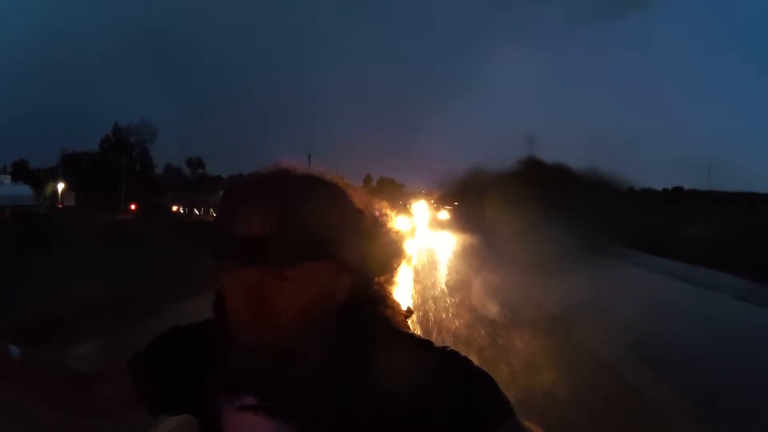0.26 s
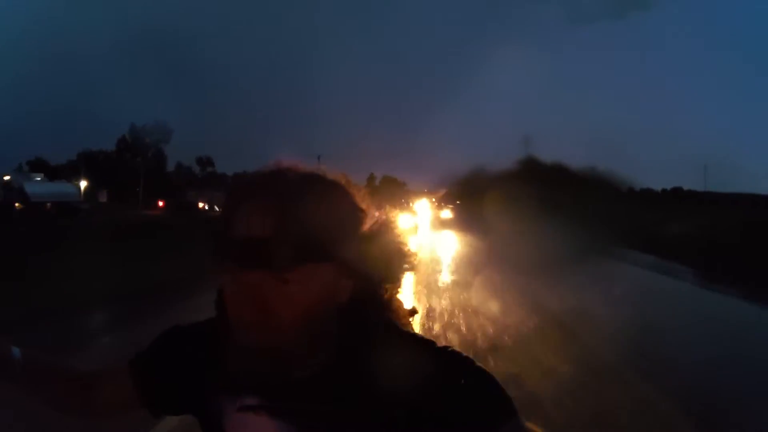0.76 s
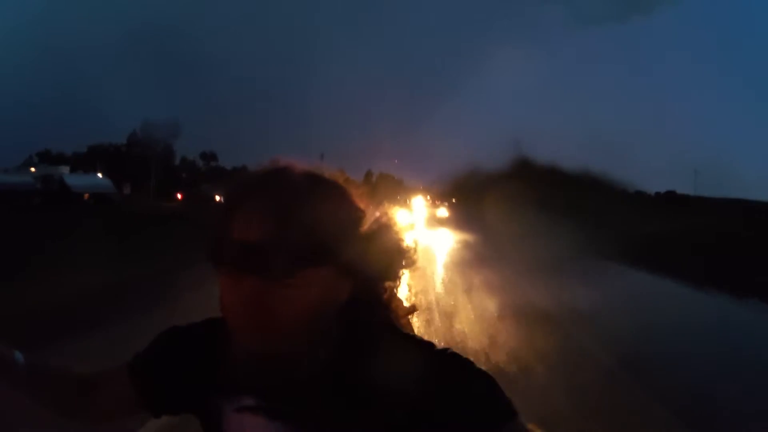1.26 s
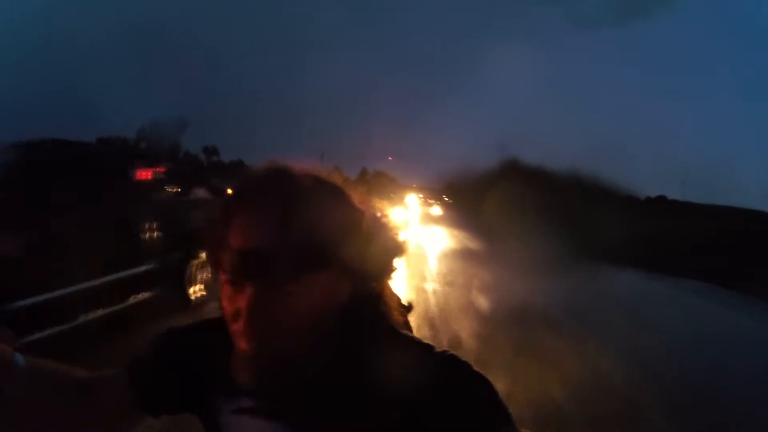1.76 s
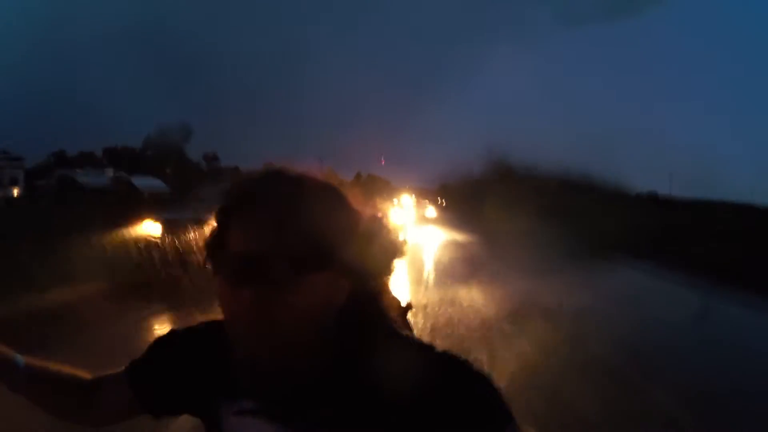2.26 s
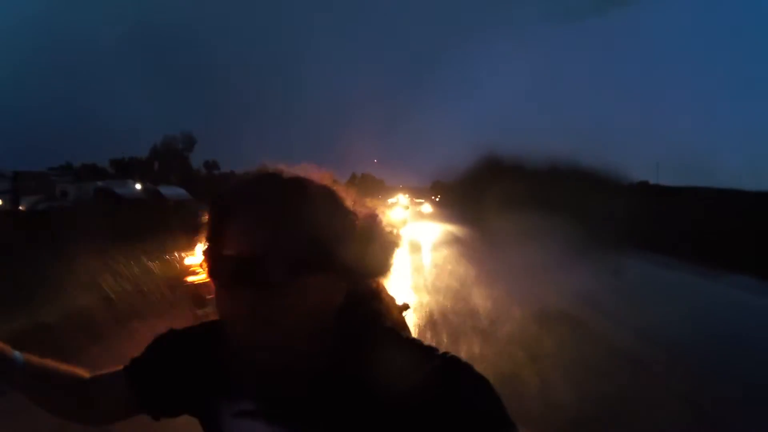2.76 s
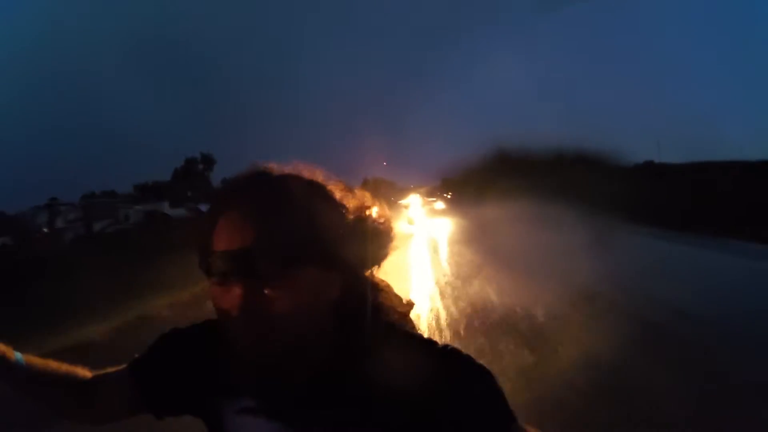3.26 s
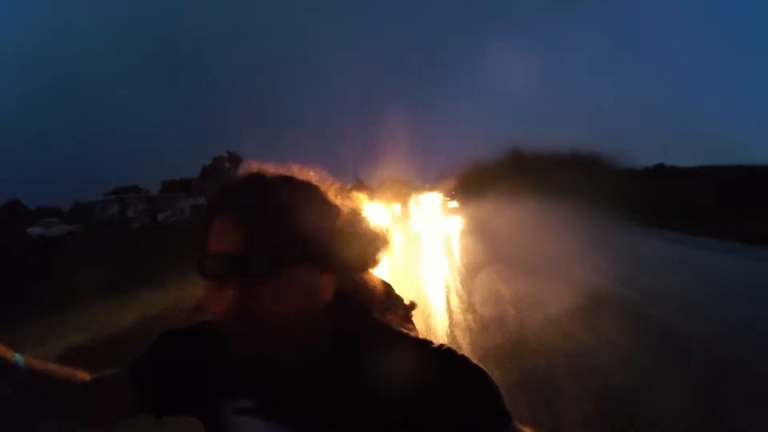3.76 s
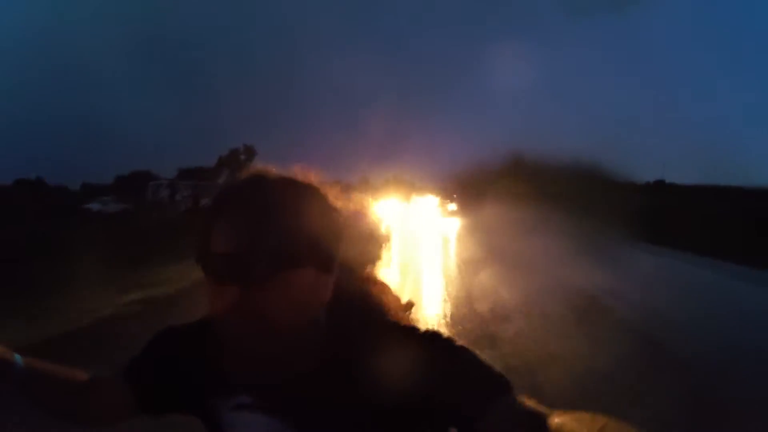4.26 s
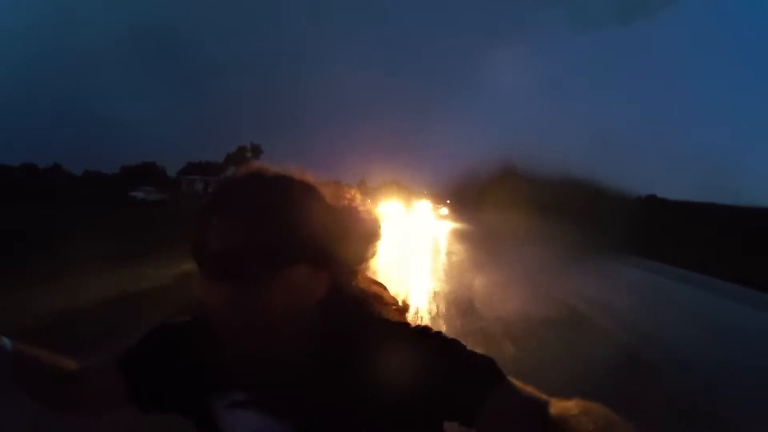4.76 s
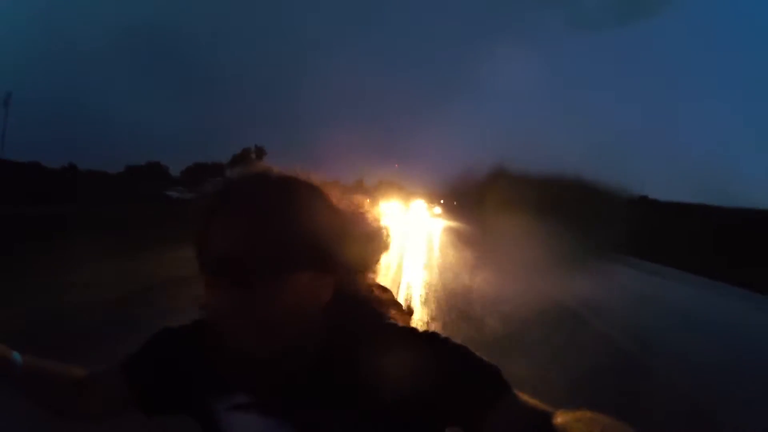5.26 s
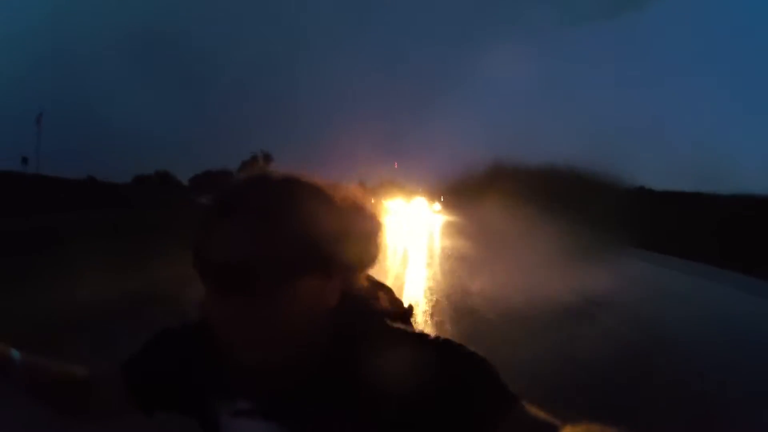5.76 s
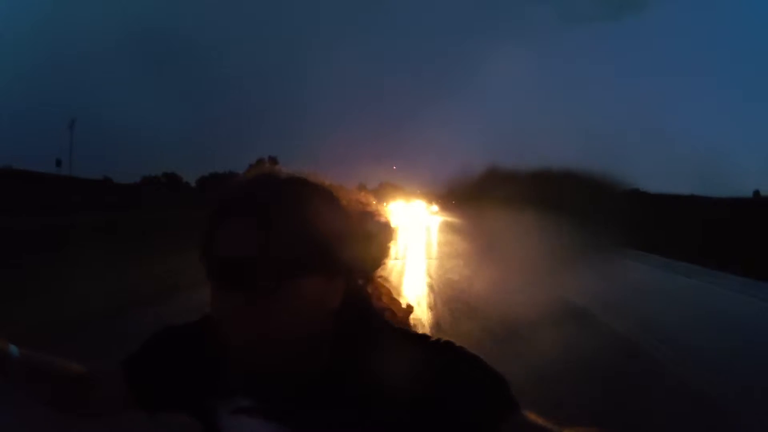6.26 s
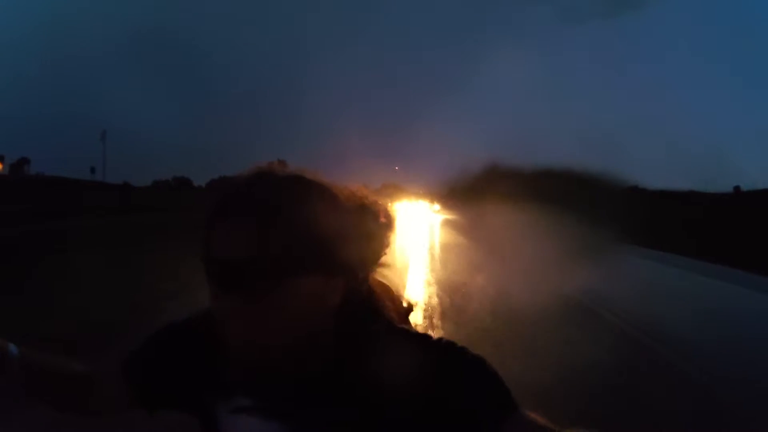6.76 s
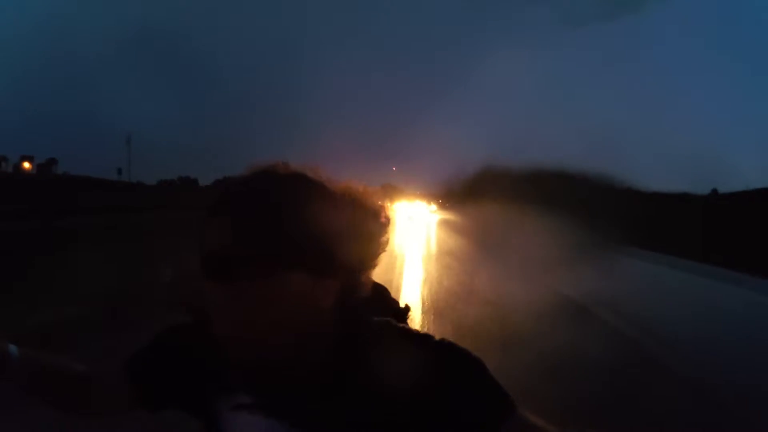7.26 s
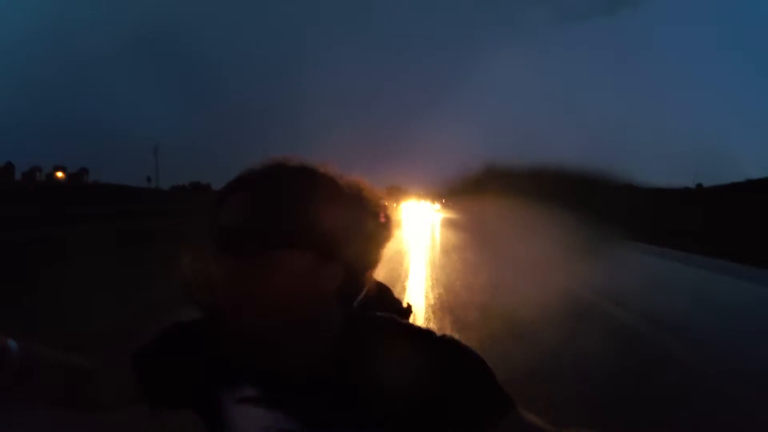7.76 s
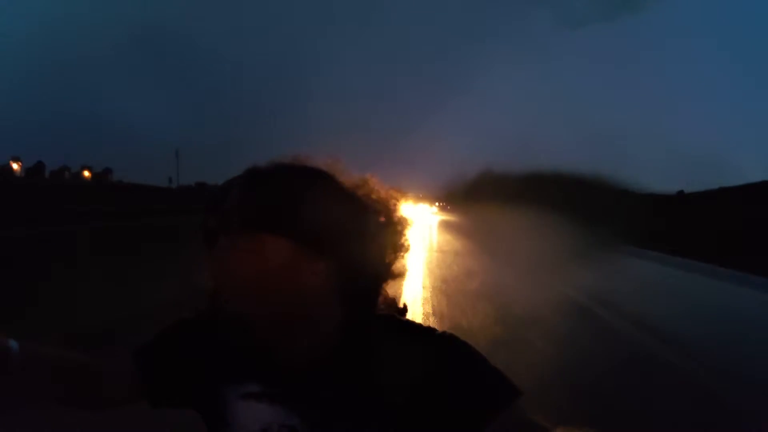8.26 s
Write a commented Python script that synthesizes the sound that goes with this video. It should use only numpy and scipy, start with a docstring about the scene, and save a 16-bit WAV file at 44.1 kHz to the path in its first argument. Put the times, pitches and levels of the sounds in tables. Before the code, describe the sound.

Heard from a case mounted on a moving motorcycle, a low twin-cylinder engine drones with light valve clatter, then pulls harder and rises in pitch. The revs fall abruptly with a faint whine, a few clacks and a brief squeal as the next gear catches, and it cruises on. Behind it are buffeting wind, spray from the wet road and sharp ticks of water drops.

```python
"""A V-twin motorcycle thrums along a wet highway, heard from a waterproof case on the bike.
It cruises, barks under an open throttle, shuts off for an upshift and cruises on.
Firings ring the pipe and muffler, pistons shake the frame, valves clatter and gears whine.
Behind the engine, wind rushes, tyres hiss through water and drops tick on the case."""
import sys
import numpy as np
from scipy import signal
from scipy.fft import rfft, irfft, next_fast_len
from scipy.io import wavfile
from scipy.ndimage import map_coordinates

SR = 44100
rng = np.random.default_rng(int(sys.argv[2]) if len(sys.argv) > 2 else 0)


def wrap_up_sound(samples):
    """Save the sound to the file named by the first command line argument, as 16-bit audio."""
    columns = np.atleast_2d(samples).T
    # keep every value between -1 and 1, then stretch to whole-number steps
    tamed = np.clip(columns, -1, 1)
    steps = np.round(tamed * 32767).astype(np.int16)
    wavfile.write(sys.argv[1], SR, steps)


N = 376173
TIME = np.arange(N) / SR

# air and water rushing past (time [s], relative wind level [dB], relative spray level [dB])
ROAD_LEVELS = [(0.0, -26, -56), (1.14, -32.5, -51.5), (1.8, -36.5, -60), (3.82, -31, -57), (4.39, -30, -58),
               (5.25, -30.5, -54.5), (5.51, -30.5, -58.5), (5.8, -36, -62), (7.86, -29, -53),
               (8.53, -31.5, -56.5)]
# colour of the wind on the case (frequency [Hz], relative level [dB])
WIND_COLOUR = [(20, -54), (35, -0.5), (50, -32.5), (70, 14), (120, -0.5), (165, 17.5), (205, -0.5),
               (260, 9), (400, 12.5), (530, 0), (680, 4.5), (850, 1.5), (1000, -9), (2300, -51)]
# colour of the tyre spray (frequency [Hz], relative level [dB])
SPRAY_COLOUR = [(900, -9), (1500, 3.5), (2300, 4.5), (2650, -8), (3300, 0), (3750, 0.5), (4100, -12.5),
                (4400, -3.5), (5000, -5.5), (5400, -19.5), (6200, -36), (8000, -74.5)]
# buffets of air, the first from oncoming traffic (time [s], half length [s], level [dB])
GUST_SWELLS = [(1.447, 0.49, -28.5), (7.75, 0.22, -37)]
# colour of those buffets (frequency [Hz], relative level [dB])
GUST_COLOUR = [(20, -21), (35, -11.5), (190, 5.5), (300, -29.5), (1000, -64)]
# drops on the case (time [s], ring level [dB], ring pitch [Hz], relative splat level [dB])
DROP_HITS = [(0.1423, -24, 3150, -32), (0.613, -33, 3600, -28), (1.083, -7, 3600, -21.5),
             (1.268, -22, 3400, -31.5), (1.281, -17.5, 3150, -33.5), (1.3518, -23, 3600, -29),
             (1.4192, -17.5, 3700, -24), (1.6886, -23, 3630, -26), (1.7429, -22.5, 3520, -38.5),
             (2.8802, -8.5, 3740, -19), (3.9459, -26, 3480, -36), (5.008, -21.5, 3620, -30),
             (5.297, -20.5, 3470, -31.5), (5.673, -29, 3940, -31), (5.9806, -21, 3700, -21.5),
             (6.0324, -11.5, 3760, -29), (6.1926, -14, 3410, -25), (6.3925, -23, 3560, -37.5),
             (6.516, -11.5, 3480, -26.5), (6.6646, -17, 3430, -33.5), (6.754, -23, 3450, -35),
             (6.995, -18.5, 3500, -32.5), (7.0728, -14.5, 3520, -25.5), (7.1185, -22, 3400, -24.5),
             (7.3785, -22.5, 3620, -30), (7.9162, -22.5, 3480, -34.5), (8.497, -19, 3600, -35)]
# colour of a drop's splat (frequency [Hz], relative level [dB])
SPLAT_COLOUR = [(1500, -35.5), (3100, -0.5), (4800, 3), (6500, -7), (9000, -29.5), (12000, -31.5)]

# gearbox clacks during the shift (time [s], strength [dB])
SHIFT_CLACKS = [(4.872, -20), (4.903, -21.5), (4.941, -24), (5.281, -21.5)]
# colour of the gearbox housing (frequency [Hz], relative level [dB])
GEARBOX_COLOUR = [(400, -12.5), (800, 3.5), (2700, -7.5), (4900, -8.5), (6300, -49)]
# tones that whine as the revs fall (order [cycles per crank turn], level [dB])
OVERRUN_WHINES = [(21, -46.5), (32, -45)]
# gearbox resonances the low mesh sweeps through (frequency [Hz], width [Hz], level [dB])
GEARBOX_MODES = [(1226, 11, -43), (1550, 130, -46)]
# engine case resonances (frequency [Hz], width [Hz], relative level [dB])
ENGINE_CASE_MODES = [(727, 100, 7), (1114, 67, 1), (1214, 6.1, 4), (1440, 178, 4), (1839, 54.6, 9.5),
                     (2362, 77, 0.5), (3316, 160, -9), (3733, 54, -3)]
# tappet resonances (frequency [Hz], width [Hz], relative level [dB])
TAPPET_MODES = [(1908, 55, 2), (3630, 260, -14)]
# spells of louder tappet ticking (time [s], half length [s], level [dB])
TAPPET_SWELLS = [(2.55, 0.2, -48.5), (5.55, .3, -45)]
# colour of the frame (frequency [Hz], relative level [dB])
FRAME_COLOUR = [(120, -40), (200, -7.5), (245, 8), (290, 0.5), (350, 10.5), (430, 4), (560, -11),
                (620, 2.5), (790, -1.5), (950, -14), (1120, -10), (2200, -54.5)]

# muffler and bodywork booms (frequency [Hz], width [Hz], level [dB])
BOOM_MODES = [(75.2, 16.2, -23.5), (103, 11, -30.5), (146.9, 5.8, -19.5), (167.6, 13, -28), (253, 54, -33)]
# tones that shake the bodywork (order [cycles per crank turn], gain [dB], change when shut off [dB])
BOOM_ORDERS = [(2, 0.5, 0.5), (4, -8, 10), (5, 0, 2)]
# single hard firings in the muffler (time [s], strength [dB])
THUMP_HITS = [(5.285, -6.5), (6.42, -9), (6.577, -8.5)]
# muffler and frame resonances (frequency [Hz], width [Hz], relative level [dB])
MUFFLER_MODES = [(170, 41, -15.5), (250, 24.8, 0), (294, 38.5, -1), (343, 64, -4.5), (390, 26.5, -8),
                 (479.6, 13, -14), (611.6, 11, -14.5), (726, 72, -18.5), (859.5, 40, -18)]
# colour of the exhaust pipe under load (frequency [Hz], relative level [dB])
PIPE_COLOUR = [(45, -50.5), (70, -4.5), (100, -14), (215, -10), (255, -2), (290, 6), (335, 3), (385, 0.5),
               (428, -19.5), (470, -14.5), (760, -27.5), (1300, -34.5), (3000, -80.5)]
# how much harder the rear cylinder barks than the front (time [s], lead [dB])
REAR_ACCENT = [(1.2, 6), (2.2, -1), (3.25, 3), (3.7, 6), (4.3, 0), (5.4, -0.5), (6.9, 8.5)]
# the revs (time [s], crank speed [turns/s])
CRANK_SPEED = [(0.0, 33.06), (0.65, 33.08), (1.12, 33.52), (1.8, 36.8), (2.6, 41.54), (3.65, 47.34),
               (4.71, 52.28), (4.85, 48.22), (5.15, 40.41), (5.28, 41.07), (5.47, 37.05), (5.8, 37.81),
               (6.7, 39.23), (7.85, 39.81), (8.53, 39.27)]
# the rider's hand: cruise, pull, shut off, cruise (time [s], throttle [0-1])
THROTTLE_MOVES = [(0, 0.1), (1.05, 0.29), (1.35, 0.51), (2, 0.68), (3.02, 0.75), (3.2, 0.97), (4.1, 0.83),
                  (4.7, 1), (4.72, 0.2), (5.15, 0.06), (5.35, 0.47), (6.6, 0.45), (8.53, 0.09)]
OVERRUN_FROM_S, OVERRUN_TO_S = 4.73, 5.31  # throttle shut: the wheel drives the engine


def amp(db):
    """Decibels to gain."""
    return 10 ** (np.asarray(db) / 20)


def unit(x):
    """Scale to rms 1."""
    return x / np.sqrt(np.mean(x ** 2) + 1e-20)


def step(x):
    """A soft switch from 0 to 1 as x passes zero."""
    return (1 + np.tanh(x)) / 2


def curves(rows):
    """One value per sample for each column after the time."""
    times, *columns = np.transpose(rows)
    return [np.interp(TIME, times, column) for column in columns]


def swells(rows):
    """Gain of bell-shaped swells (time [s], half length [s], level [dB])."""
    return sum(amp(db) * np.exp(-((TIME - s) / half) ** 2) for s, half, db in rows)


def wobble(rate):
    """A smooth random curve, rate knots a second."""
    return map_coordinates(rng.standard_normal(int(N * rate / SR) + 4), [TIME * rate])


def filtered(x, response):
    """x through a complex frequency response."""
    size = next_fast_len(N + SR // 2)
    return irfft(rfft(x, size) * response(np.fft.rfftfreq(size, 1 / SR)), size)[:N]


def coloured(x, colour, size=16384):
    """x through a causal EQ curve (frequency [Hz], level [dB]), at rms 1."""
    hz, db = np.transpose(colour)
    grid = np.fft.rfftfreq(size, 1 / SR)
    gain = amp(np.interp(np.log(grid + 1), np.log(hz), db)) / (1 + (grid / hz[-1] / 2) ** 4)
    cepstrum = irfft(np.log(gain)) * (1 + np.sign(np.fft.fftfreq(size)))  # minimum phase
    impulse = np.fft.fftshift(irfft(np.exp(rfft(cepstrum))))
    return unit(signal.fftconvolve(x, impulse)[size // 2:][:N])


def resonate(x, modes):
    """x rings a set of resonances, at rms 1."""
    def response(f):
        peaks = sum((-1) ** k * amp(db) * 1j * f * width / (hz * hz - f * f + 1j * f * width)
                    for k, (hz, width, db) in enumerate(modes))
        low_cut_hz, high_cut_hz = modes[0][0] / 2, modes[-1][0] * 1.35
        return peaks / (1 + (f / high_cut_hz) ** 12) / (1 + (low_cut_hz / (f + 1)) ** 4)
    return unit(filtered(x, response))


def swept(hz, modes):
    """Gain of a tone whose pitch moves through resonances."""
    return sum(amp(db) / (1 + (2 * (hz - centre) / width) ** 2) ** 1.23 for centre, width, db in modes)


def strokes(cycle, phase, scatter_db, jitter_s):
    """One impulse per cycle at a phase of 0-1, uneven in size and timing."""
    marks = np.arange(int(cycle[-1]) + 1) + phase
    timing, strength = rng.standard_normal((len(marks), 2)).T
    times = np.interp(marks, cycle, TIME, right=TIME[-1] + 1) + jitter_s * timing
    index = np.clip(np.round(times * SR).astype(int), 0, N)
    return np.bincount(index, amp(scatter_db * np.tanh(strength / 2) * 2), N + 1)[:N]


def ragged(hits, decay_s):
    """Every impulse trails a dying burst of noise."""
    envelope = signal.fftconvolve(hits, np.exp(-TIME[:SR // 10] / decay_s))[:N]
    return envelope * rng.standard_normal(N)


def whine(order, cycle):
    """A slightly unsteady tone at a multiple of the crank speed."""
    return unit(np.sin(round(order) * 4 * np.pi * cycle + wobble(40)) * amp(2.5 * wobble(40)))


def road():
    """The bed: turbulent wind buffets the case, and tyres hiss as they throw water."""
    wind_db, spray_db = curves(ROAD_LEVELS)
    gust = wobble(5.7)
    wind = coloured(rng.standard_normal(N), WIND_COLOUR)
    wind *= amp(wind_db + 3.5 + 1.2 * gust + 1.8 * wobble(45))
    spray = coloured(rng.standard_normal(N), SPRAY_COLOUR)
    spray *= amp(spray_db + 12 + .5 * gust + wobble(70))
    buffets = swells(GUST_SWELLS) * coloured(rng.standard_normal(N), GUST_COLOUR)
    return wind + spray + buffets


def drops():
    """Each drop splats and rings the case, pitched by where it lands; fine spray adds faint ticks."""
    ring_s, splat_s, splash_db = .00024, .00019, -59
    rings, splats = np.zeros((2, N + SR))
    t = TIME[:SR // 50]
    envelope = (t / ring_s) ** 2.6 * np.exp(-t / ring_s)
    envelope /= envelope.max()
    fine_spray = [(when * TIME[-1], -46 + 14 * size ** 3, 3100 + 1000 * spot, -56 + 15 * size ** 2)
                  for when, size, spot in rng.random((130, 3))]
    for s, ring_db, hz, splat_db in list(DROP_HITS) + fine_spray:
        burst = rng.standard_normal(len(t)) * np.exp(-t / splat_s)
        rings[int(s * SR):][:len(t)] += amp(ring_db) * np.sin(2 * np.pi * hz * t) * envelope
        splats[int(s * SR):][:len(t)] += amp(splat_db) * unit(burst)
    return rings[:N] + amp(splash_db) * coloured(splats[:N], SPLAT_COLOUR)


def squeal():
    """A brief squeal as the drive takes up the next gear."""
    at_s, half_s, hz, db = 5.385, .055, 828, -27
    return swells([(at_s, half_s, db)]) * np.sin(2 * np.pi * hz * TIME + .23 * wobble(60))


def shift():
    """The gear dogs clack a few times before they catch."""
    times, db = np.transpose(SHIFT_CLACKS)
    hits = np.bincount((times * SR).astype(int), amp(db), N)
    clacks = coloured(ragged(hits, decay_s=.01), GEARBOX_COLOUR)
    return clacks / np.abs(clacks).max() * amp(db.max())


def overrun(cycle, shut):
    """Throttle shut, the drive whines down with the revs and the slack valve gear rasps ever louder."""
    tones = sum(amp(db) * whine(order, cycle) for order, db in OVERRUN_WHINES)
    fade_in = (TIME - OVERRUN_FROM_S) / (OVERRUN_TO_S - OVERRUN_FROM_S)
    rasp = resonate(rng.standard_normal(N), TAPPET_MODES) * amp(-43) * fade_in
    return shut * (tones + rasp)


def gears(cycle, speed, lug):
    """Two meshes sing with the crank: one rings the gearbox, one whirrs once a turn when lugging."""
    low_teeth, high_teeth = 31, 59
    whirr_db, lug_db = -61.5, 24
    crank = 4 * np.pi * cycle
    high_mesh = np.sin(high_teeth * crank + 1.6 * wobble(110))
    whirr = unit(high_mesh * amp(6 * np.cos(crank) + 2 * wobble(60)))
    low_mesh = whine(low_teeth, cycle) * swept(low_teeth * speed, GEARBOX_MODES)
    return low_mesh + whirr * amp(whirr_db + lug_db * lug)


def clatter(cycle, throttle, lug):
    """Lifting and closing valves ring the engine case; one tappet ticks in spells, two when lugging."""
    def tap(phase):
        return strokes(cycle, phase, scatter_db=1.5, jitter_s=.00005)

    def rattle(hits, modes):
        return unit(resonate(hits, modes) + resonate(ragged(hits, decay_s=.004), modes))

    case_db, lug_db, tappet_db, load_db = -38, 4, -47, -.5
    valves = sum(tap(phase) for phase in (.03, .14, .29, .46, .63, .79, .94))
    case = rattle(valves, ENGINE_CASE_MODES) * amp(case_db + lug_db * lug)
    ticks = tap(.02) + .55 * lug * tap(.48)
    tappets = rattle(ticks, TAPPET_MODES) * (amp(tappet_db) * lug + swells(TAPPET_SWELLS))
    return (case + tappets) * amp(load_db * throttle)


def thrum(cycle, throttle, lug):
    """The pistons shake the frame on every crank turn: a clean drone, strongest when the engine lugs."""
    thrum_db, lug_db, load_db = -30.5, 7.8, -6
    shakes = strokes(2 * cycle, .3, scatter_db=.8, jitter_s=.00003)
    frame = coloured(shakes, FRAME_COLOUR)
    # the shake reaches the case by many paths, which smears it over the turn
    paths = rng.standard_normal(SR // 40) * np.exp(-TIME[:SR // 40] / .012)
    smear = irfft(np.exp(1j * np.angle(rfft(paths))))
    return unit(signal.fftconvolve(frame, smear)[:N]) * amp(thrum_db + lug_db * lug + load_db * throttle)


def boom(cycle, speed, shut):
    """Low crank orders swell whenever the revs carry them through a muffler or bodywork resonance."""
    crank = 4 * np.pi * cycle
    booms = np.zeros(N)
    for order, db, shut_db in BOOM_ORDERS:
        tone = np.sqrt(2) * np.sin(round(order) * crank)
        booms += tone * swept(round(order) * speed, BOOM_MODES) * amp(db + shut_db * shut + 1.1 * wobble(14))
    return booms


def thumps():
    """Now and then one firing hits the muffler much harder than its neighbours."""
    times, db = np.transpose(THUMP_HITS)
    hits = np.bincount((times * SR).astype(int), amp(db), N)
    ring = resonate(hits, MUFFLER_MODES)
    return ring / np.abs(ring).max() * amp(db.max())


def hollow(cycle, throttle, shut):
    """Slack gas swirls in the muffler and rings one note; throttle shut, it cools and the note drops."""
    hot_hz, cool_hz, width_hz = 247, 231, 14
    hot_db, cool_db, load_db = -22, -24, -24
    swirl = ragged(strokes(2 * cycle, .4, scatter_db=2, jitter_s=.001), decay_s=.02)

    def chamber(hz):
        ring = resonate(swirl, [(hz, width_hz, 0)])
        return unit(filtered(ring, lambda f: 1 / (1 + (f / 300) ** 8)))

    hot = chamber(hot_hz) * amp(hot_db + load_db * throttle)
    cool = chamber(cool_hz) * amp(cool_db)
    return (1 - shut) * hot + shut * cool


def burble(cycle, throttle):
    """On a light throttle uneven firings ring the muffler, each trailing a puff of turbulent gas."""
    burble_db, duck_db = -21.5, 12
    rough_throttle, rough_width = .38, .26  # the zone where it burbles most
    firings = sum(size * strokes(cycle, phase, scatter_db=2.1, jitter_s=.00009)
                  for phase, size in ((.94, .65), (.56, 1)))
    puffs = .48 * resonate(ragged(firings, decay_s=.011), MUFFLER_MODES)
    rough = np.exp(-((throttle - rough_throttle) / rough_width) ** 2)
    return unit(resonate(firings, MUFFLER_MODES) + puffs) * amp(burble_db - duck_db * (1 - rough))


def bark(cycle, throttle):
    """Under load both cylinders fire hard into the pipe, whose end echoes each blast."""
    bark_db, bark_duck_db, hard_throttle = -15, 14, .43
    echo_s, echo_db = .0105, -13
    rasp_db, rasp_duck_db = -23.5, 20
    closed = 1 - throttle
    rear_gain = amp(curves(REAR_ACCENT)[0])
    front = strokes(cycle, .995, scatter_db=1.3, jitter_s=.00013)
    rear = strokes(cycle, .537, scatter_db=1.3, jitter_s=.00012)
    unevenness = 1 + closed
    firings = (front ** unevenness + rear_gain * rear ** unevenness) / np.hypot(1, rear_gain)
    pipe = coloured(firings, PIPE_COLOUR)
    blasts = unit(filtered(pipe, lambda f: 1 + amp(echo_db) * np.exp(-2j * np.pi * f * echo_s)))
    # with the throttle wide open each blast ends in a rasp of gas
    rasp = resonate(ragged(firings, decay_s=.0059), [(456, 80, 5), (680, 200, -1), (1090, 870, -8.5)])
    rasp *= amp(rasp_db - rasp_duck_db * closed)
    firing_hard = step((throttle - hard_throttle) / .097)
    return (blasts + rasp) * amp(bark_db - bark_duck_db * closed) * firing_hard


def scene():
    """Revs and throttle play the engine over the wet road."""
    speed, = curves(CRANK_SPEED)
    throttle, = curves(THROTTLE_MOVES)
    cycle = np.cumsum(speed) / SR / 2  # a four-stroke cycle takes two crank turns
    lug = step((35.15 - speed) / .86)  # below about 35 turns/s the engine lugs and slack parts rattle
    shut = step((TIME - OVERRUN_FROM_S) / .02) * step((OVERRUN_TO_S - TIME) / .03)
    exhaust = bark(cycle, throttle) + burble(cycle, throttle) + hollow(cycle, throttle, shut)
    low_end = thumps() + boom(cycle, speed, shut) + thrum(cycle, throttle, lug)
    machinery = clatter(cycle, throttle, lug) + gears(cycle, speed, lug) + overrun(cycle, shut)
    return (exhaust + low_end + machinery + shift() + squeal() + road() + drops())[None]


def record(dry):
    """A steep low-pass takes off the highest treble."""
    top_hz = 13000
    return signal.sosfilt(signal.butter(12, top_hz, fs=SR, output="sos"), dry)


dry = scene()
out = record(dry)
wrap_up_sound(out)
```